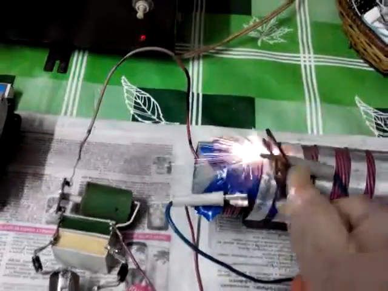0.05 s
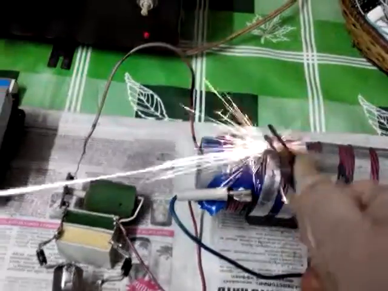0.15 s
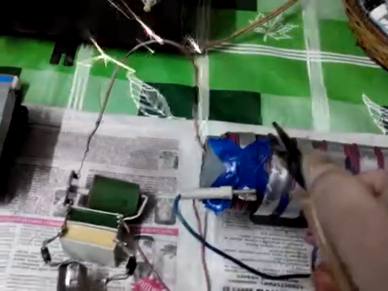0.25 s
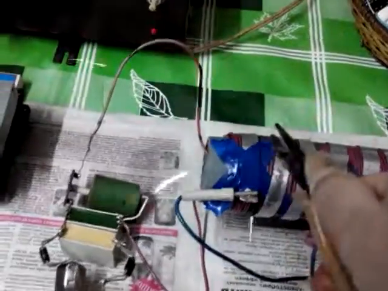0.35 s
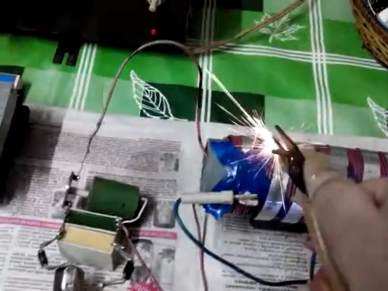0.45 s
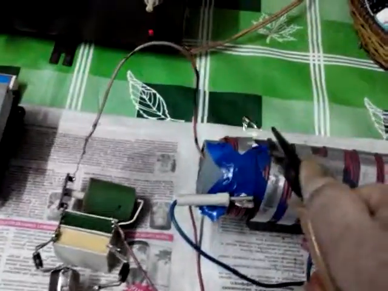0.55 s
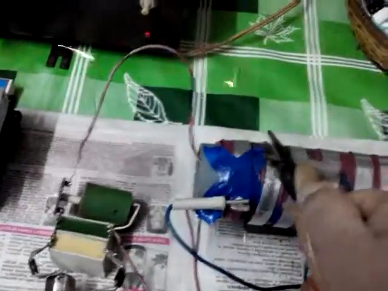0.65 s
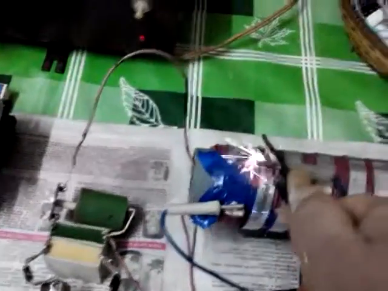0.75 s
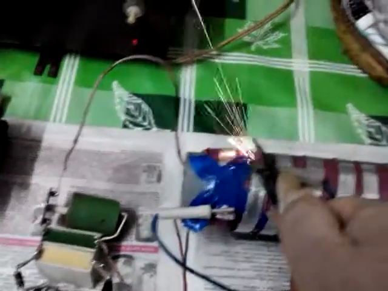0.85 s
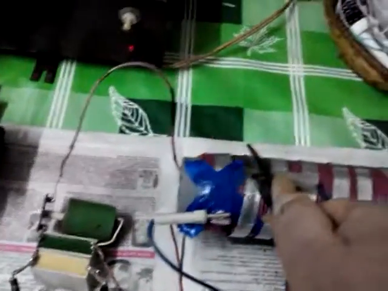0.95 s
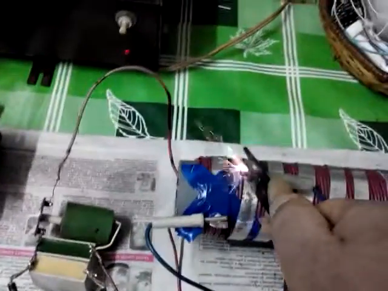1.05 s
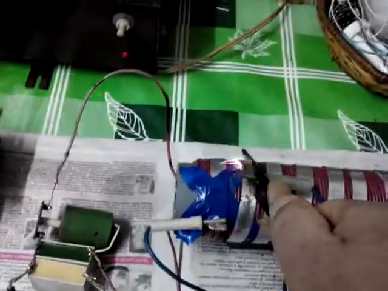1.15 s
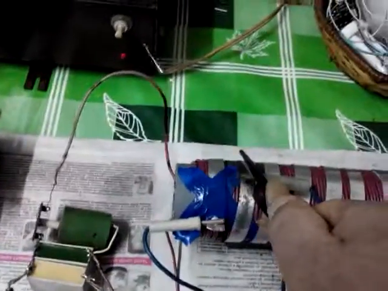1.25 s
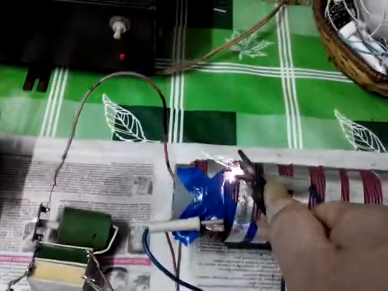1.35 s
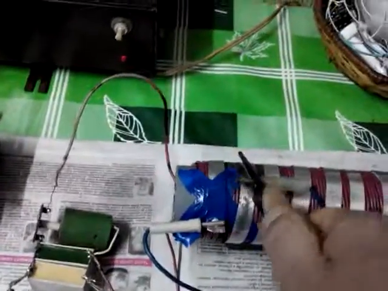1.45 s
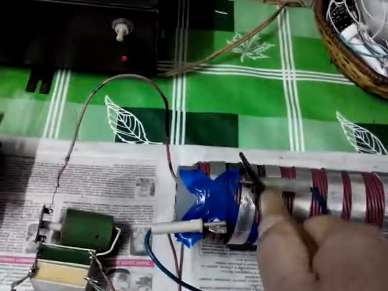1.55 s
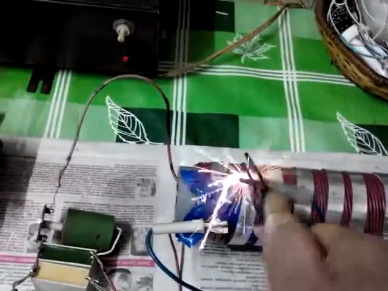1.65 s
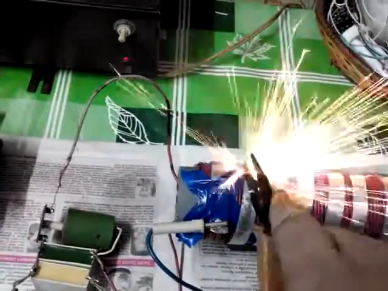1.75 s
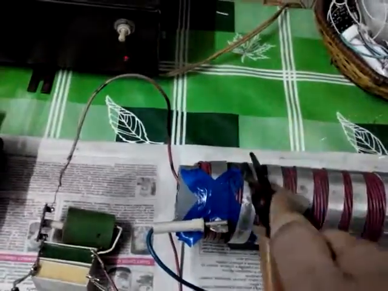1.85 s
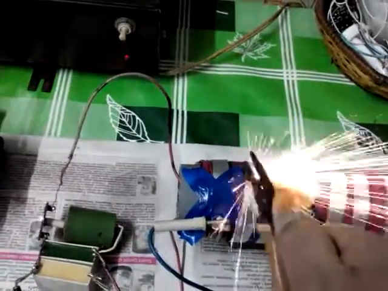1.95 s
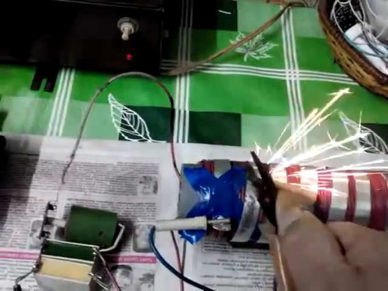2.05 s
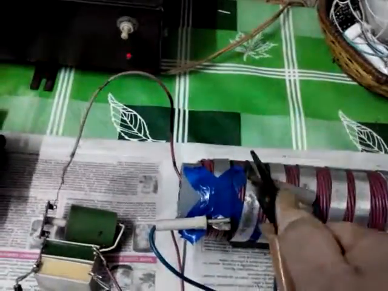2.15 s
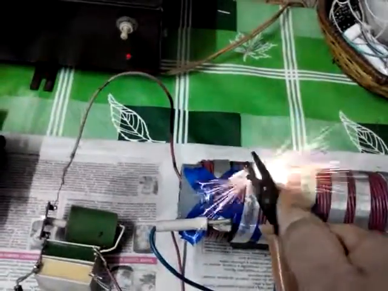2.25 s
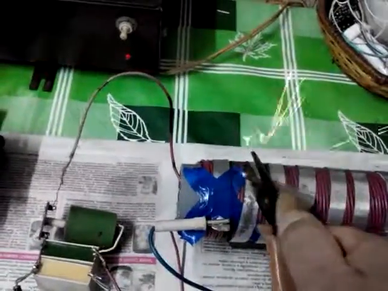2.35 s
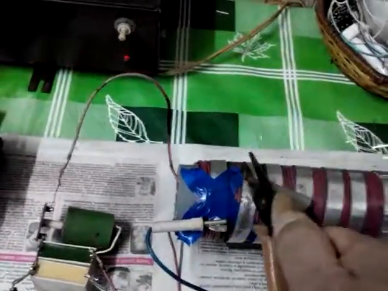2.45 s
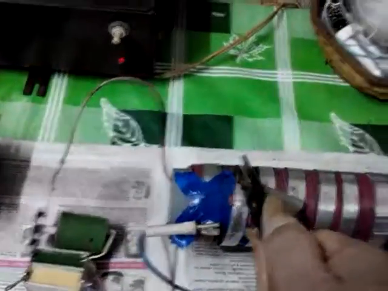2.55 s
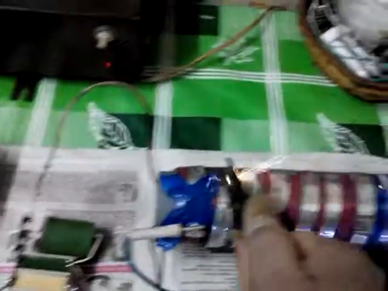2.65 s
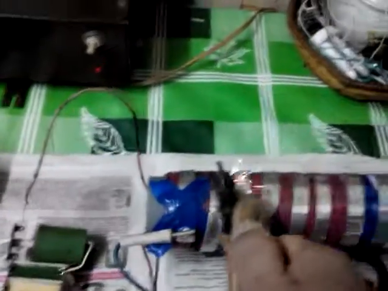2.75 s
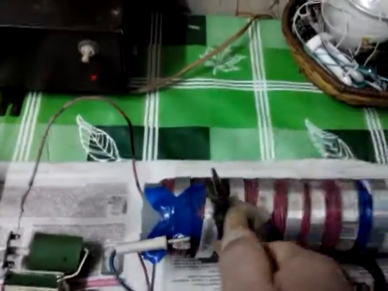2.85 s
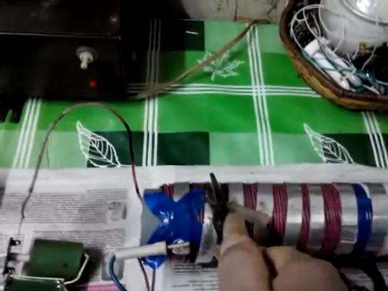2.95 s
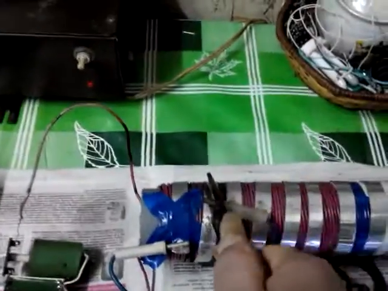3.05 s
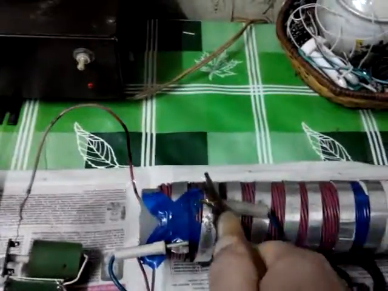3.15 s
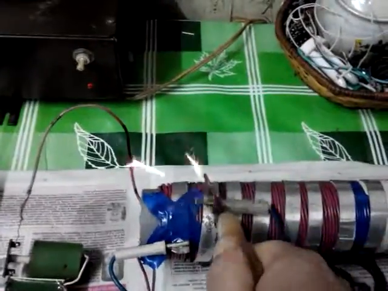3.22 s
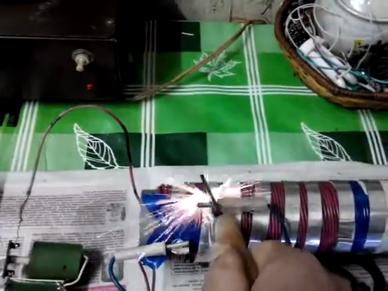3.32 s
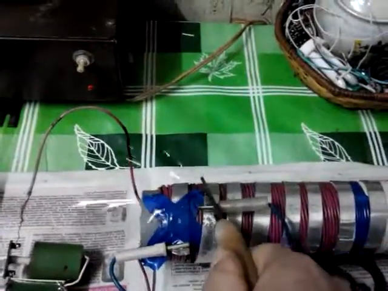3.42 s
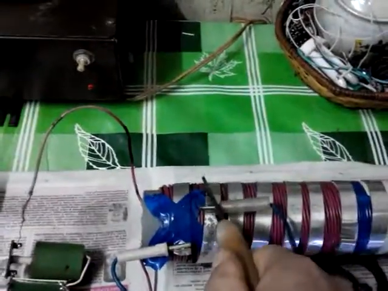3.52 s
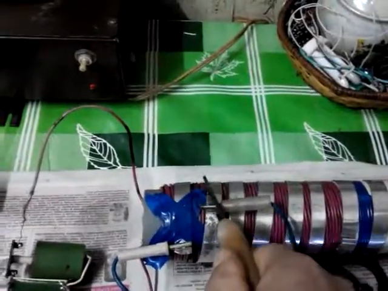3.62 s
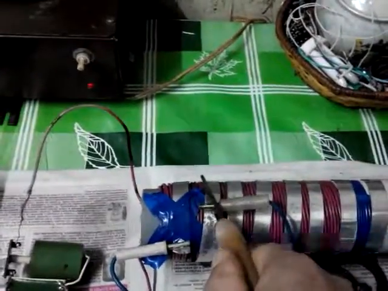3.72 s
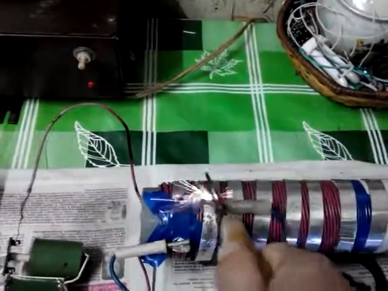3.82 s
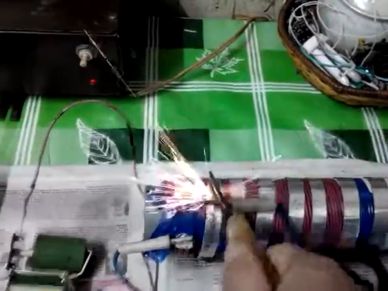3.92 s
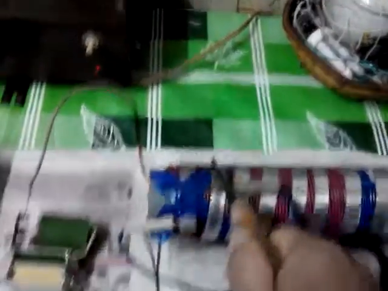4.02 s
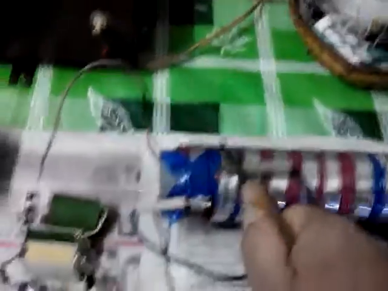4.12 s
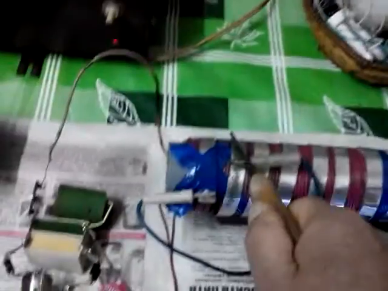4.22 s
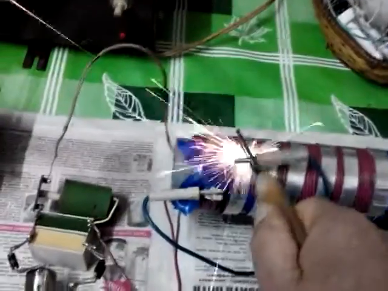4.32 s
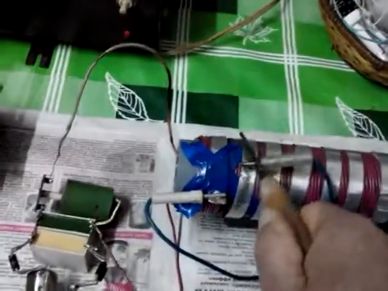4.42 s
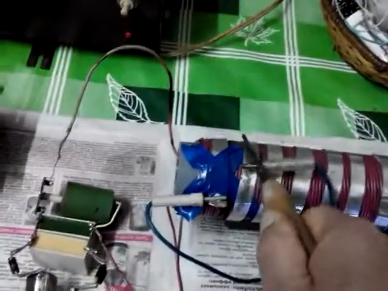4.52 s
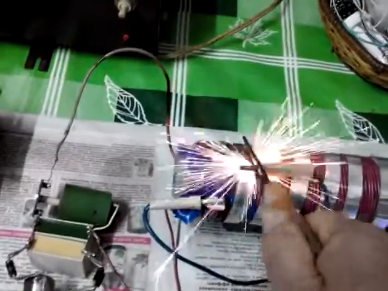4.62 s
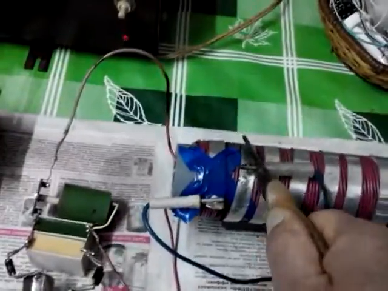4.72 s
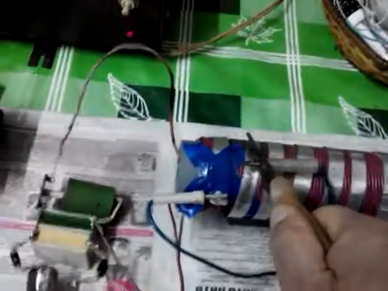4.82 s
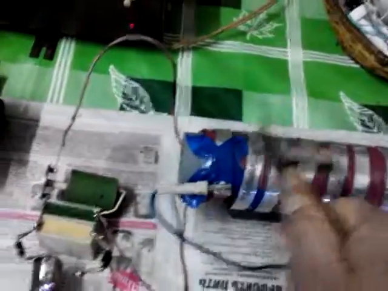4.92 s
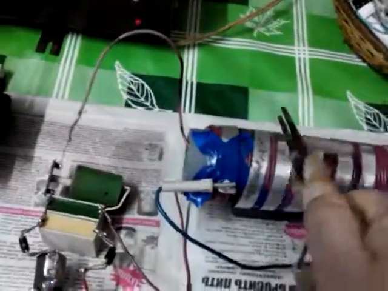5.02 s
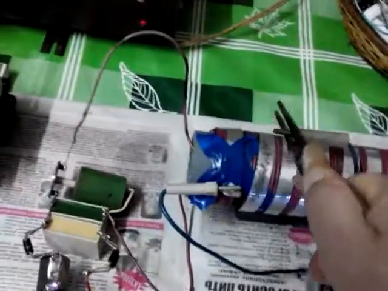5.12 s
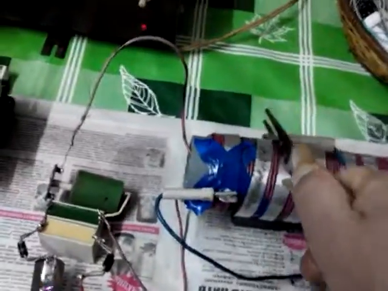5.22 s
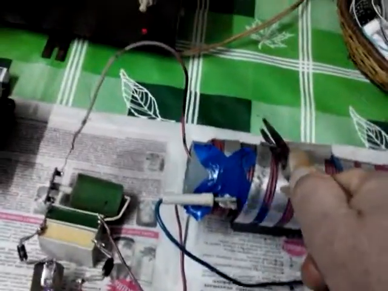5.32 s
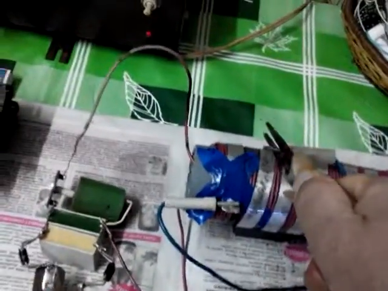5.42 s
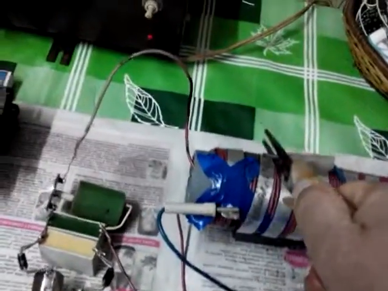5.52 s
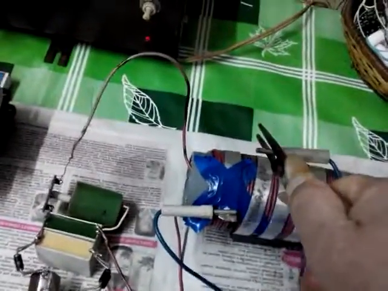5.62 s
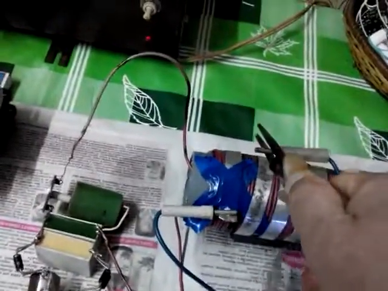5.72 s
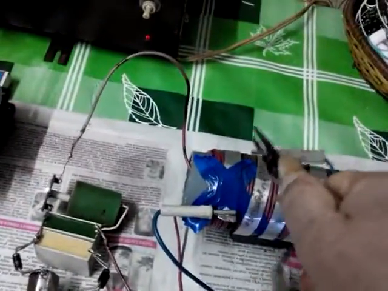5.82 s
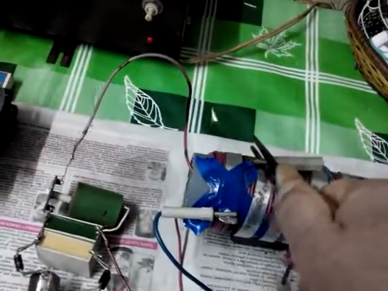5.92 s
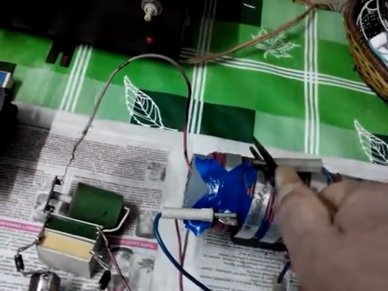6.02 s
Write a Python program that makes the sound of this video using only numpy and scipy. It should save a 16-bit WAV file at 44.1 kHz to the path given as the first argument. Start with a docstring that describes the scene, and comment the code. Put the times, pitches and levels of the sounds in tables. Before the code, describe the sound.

Rapid high-voltage sparks rattle like a fast hard ticking, irregular in strength. Strong crackling bursts open the scene, ease off, return louder near two seconds, then thin to small metallic clicks with a few medium cracks around four. A hand-held clamp bumps the coil near five seconds. Close phone microphone, slightly overloaded, small indoor room, quiet low hum.

```python
"""A transformer hums over a low room rumble and a thin circuit whine; at once a relay chatters, about 13 breaks/s.
It pulses a home-wound high-voltage coil on a workbench, close to a phone. Each break fires a spark: a pressure
spike, tube ring, bounce and scattered noise, then a noise room tail. Where a hand-held clamp bites the winding,
the spark cracks loudly and pushes a low thump. The relay's metal rings faintly as decaying sines.
Hand bumps add a knock (decaying sine) and a metal tick (filtered noise)."""
import sys
import numpy as np
from scipy import signal
from scipy.fft import rfft, irfft, next_fast_len
from scipy.io import wavfile
from scipy.ndimage import map_coordinates

SR = 44100
rng = np.random.default_rng(int(sys.argv[2]) if len(sys.argv) > 2 else 0)


def inscribe(sig):
    """Save sig as 16-bit PCM at rate SR to the path in sys.argv[1].

    A 1-D sig is mono; a 2-D sig holds one channel per row.
    Samples are clipped to [-1, 1] before scaling.
    """
    pcm = np.round(np.clip(np.atleast_2d(sig).T, -1, 1) * 32767)
    wavfile.write(sys.argv[1], SR, pcm.astype(np.int16))


N = 267687  # samples
SIDES = np.array([[1], [-1]])  # left, right


def amp(db):
    """Decibels to gain."""
    return 10 ** (np.asarray(db) / 20)


def unit(x):
    """x at rms 1."""
    return x / np.sqrt(np.mean(x ** 2) + 1e-20)


def along(points, hz):
    """Interpolate (Hz, value) points on a log frequency axis."""
    f, v = np.transpose(points)
    return np.interp(np.log(hz + 1), np.log(f + 1), v)


def filtered(x, response):
    """x times a response of frequency."""
    n = x.shape[-1]
    m = next_fast_len(n + SR // 20)
    spectrum = rfft(x, m) * response(np.fft.rfftfreq(m, 1 / SR))
    return irfft(spectrum, m)[..., :n]


def coloured(x, points, size=2048):
    """x through a causal minimum-phase filter with the given (Hz, dB) shape."""
    gain = amp(along(points, np.fft.rfftfreq(size, 1 / SR)))
    cepstrum = irfft(np.log(gain))
    # fold the cepstrum to make the filter causal
    cepstrum[1:size // 2] *= 2
    cepstrum[size // 2 + 1:] = 0
    kernel = irfft(np.exp(rfft(cepstrum)))
    return signal.fftconvolve(np.atleast_2d(x), kernel[None], axes=1)[:, :x.shape[-1]]


def add(track, start_s, sound):
    """Mix a sound into the track at start_s, cut at the track's end."""
    rest = track[..., max(round(start_s * SR), 0):]
    part = rest[..., :sound.shape[-1]]
    part += sound[..., :part.shape[-1]]


def blend(shared, own, share):
    """Mix two noises, keeping the power."""
    share = np.clip(share, 0, 1)
    return np.sqrt(share) * shared + np.sqrt(1 - share) * own


def wander(rate_hz, spare):
    """Smooth random curve with rate_hz new values per second."""
    t = np.arange(N) / SR
    values = rng.standard_normal(N // SR * rate_hz + spare)
    return map_coordinates(values, [rate_hz * t])


# transformer hum partials: f/Hz, level/dB rms
HUM = [(100.2, -53), (200.4, -65.5), (301, -62)]


def transformer_hum(waver_rad=0.67):
    """Mains hum: sine partials, each wavering slowly in phase."""
    t = np.arange(N) / SR
    hum = np.zeros(N)
    for hz, db in HUM:
        phase = 2 * np.pi * hz * t + waver_rad * wander(4, 8)
        hum += amp(db) * np.sqrt(2) * np.sin(phase)
    return hum


# room rumble spectrum, relative: f/Hz, density/dB per Hz
AIR = [(20, -12), (40, -5.5), (65, -5), (90, 2), (132, 6.5), (170, -8), (240, -11), (305, -9.5), (450, -18),
       (900, -28.5), (2000, -29.5), (4000, -18), (7500, -28), (9000, -69.5)]


def room_rumble(air_db=-51, side_db=-19, wide_hz=700):
    """Shaped noise, nearly alike at both ports in the bass, wider above wide_hz."""
    noise = rng.standard_normal((2, N))
    mid, side = unit(filtered(noise, lambda hz: amp(along(AIR, hz))))
    side = filtered(side, lambda hz: amp(side_db) + hz ** 2 / (hz ** 2 + wide_hz ** 2))
    return amp(air_db) * np.array([mid + side, mid - side])


# circuit whine, before left-right balance: t/s, level/dB rms
WHINE = [(0, -66.5), (4.4, -69.5), (4.8, -85), (5.2, -69), (5.5, -70), (6.07, -67)]


def whine(hz=2642, pan_db=-8, waver_rad=0.63):
    """Thin circuit tone: a sine, slightly unsteady in phase, mostly on the right."""
    t = np.arange(N) / SR
    level = amp(np.interp(t, *np.transpose(WHINE)) + SIDES * pan_db / 2)
    phase = 2 * np.pi * hz * t + waver_rad * wander(12, 16)
    return level * np.sqrt(2) * np.sin(phase)


WEAK_DB, STRONG_DB = -23, -14.5  # strengths that take the weak and the strong colour
# weak snap, mostly the relay's own click: f/Hz, left level/dB, right level/dB
WEAK_COLOUR = [(700, 2, 2), (1830, 4, 0.5), (3000, -6.3, -1), (3900, 2, -1.5), (4260, 0, -4),
               (5630, 1.5, -1), (6700, 6.5, 2.5), (7050, 7.5, 3)]
# strong crack on the coil: f/Hz, left level/dB, right level/dB
STRONG_COLOUR = [(686, 5, -0.5), (1310, 3, -1.5), (2030, 0.5, -2), (2920, 0, -4.5), (3730, 2.5, 0.5),
                 (4600, 1.5, -2.5), (5530, 0, -2.5), (6340, -2.5, -4), (7260, 0, -4.5)]


def spark_colour(snap_db, hz):
    """Left and right dB curves, weak to strong and on beyond, as strength grows."""
    def curves(colour):
        return np.array([along(np.array(colour)[:, [0, port]], hz) for port in (1, 2)])

    weak, strong = curves(WEAK_COLOUR), curves(STRONG_COLOUR)
    mix = max((snap_db - WEAK_DB) / (STRONG_DB - WEAK_DB), 0)
    return weak + (strong - weak) * mix


def at_ports(x, hz, tilt_db):
    """Each port's signal through its own dB curve."""
    return np.vstack([coloured(port, np.transpose([hz, db])) for port, db in zip(x, tilt_db)])


# coil's foil-wrapped tube, relative levels: f/Hz, level/dB, t60/s
TUBE = [(3544, -4.5, 0.012), (4930, -8, 0.014), (5900, -5.5, 0.0084), (6250, 1, 0.0043), (7600, -4, 0.0032)]


def snap(paths, snap_db, front_db=23.0, bounce=0.12, tube_db=2, scatter_db=11.5, mid_t60_s=0.019,
         growth_per_db=0.018, alike=0.27, reach_s=0.0045, flight_s=.00015, small_hz=2400, soft=0.02):
    """Pressure spike, tube ring, a bounce, and scatter off the small things within reach."""
    t = np.arange(paths.shape[1]) / SR
    # strong sparks jump along the coil and last longer
    life_s = mid_t60_s * np.exp(growth_per_db * (snap_db + 17.5))
    scatter = blend(paths[2], paths[:2], alike) * amp(-60 * t / life_s)
    scatter = scatter * (t > flight_s) / (1 + (t / reach_s) ** 10)

    # small things throw back mainly short waves
    def short_waves(hz):
        return np.sqrt(soft ** 2 + hz ** 4 / (hz ** 4 + small_hz ** 4))

    out = amp(scatter_db) * filtered(scatter, short_waves)
    out[:, 0] += amp(front_db)
    early = t[:SR // 50]
    for hz, db, t60_s in TUBE:
        add(out, 0, amp(tube_db + db - 60 * early / t60_s) * np.cos(2 * np.pi * hz * early))
    # the spark wanders, so the bounce notches each snap at new pitches
    delays_s = rng.uniform(.00025, .0011, 2)
    out[[0, 1], (delays_s * SR).astype(int)] += bounce * amp(front_db)
    return out


# room tail's starting spectrum, relative: f/Hz, level/dB
ROOM_COLOUR = [(100, -31), (400, 5), (1100, -13), (2000, -4), (2900, 3.5), (3620, -1), (4100, 5),
               (5400, -0.5), (6500, -0.5), (8000, -6)]
# room tail's decay: f/Hz, t60/s
ROOM_DECAY = [(200, 0.033), (1000, 0.26), (4000, 0.2), (8000, 0.18)]


def room_tail(noise, size=256):
    """Noise in which each frequency dies at the room's own speed."""
    hz, t, spectrum = signal.stft(noise, SR, nperseg=size)
    start_db = along(ROOM_COLOUR, hz)[:, None]
    fall_db = 60 * t / along(ROOM_DECAY, hz)[:, None]
    tail = signal.istft(spectrum * amp(start_db - fall_db), SR, nperseg=size)[1]
    return tail[:, :noise.shape[-1]]


# nearest hard surfaces: delay/s, level over the diffuse tail/dB
WALLS = [(.0064, -1.5), (.009, -1.5), (0.0141, -14)]


def room(paths, room_db=13, left_db=1, smear_s=0.0018):
    """Smeared early wall answers and a diffuse tail that builds up around the first of them."""
    t = np.arange(paths.shape[1]) / SR
    walls = sum(amp(db) * np.exp(-((t - delay_s) / smear_s) ** 2) for delay_s, db in WALLS)
    onset = 1 - np.exp(-(t / WALLS[0][0]) ** 2)
    return room_tail(paths[:2]) * np.hypot(onset, walls) * amp(room_db + SIDES * left_db)


# relay breaks: t/s, spark strength/dB
SPARKS = [(0.032, -19), (0.1075, -17), (0.178, -12.0), (0.2496, -16), (0.3171, -15.5), (0.3892, -14.5),
          (0.4738, -10), (0.5536, -15), (0.6296, -22), (0.7029, -18), (0.7825, -21.5), (0.8552, -12.5),
          (0.9358, -13.0), (1.014, -16.5), (1.0896, -18.5), (1.1587, -18.5), (1.2305, -19.5),
          (1.3074, -19.0), (1.385, -20), (1.457, -20.5), (1.5301, -20.5), (1.6146, -20.5), (1.695, -22.5),
          (1.768, -25), (1.8428, -24.0), (1.912, -13.5), (1.9929, -9), (2.0758, -22), (2.1438, -11),
          (2.2139, -15.5), (2.289, -17), (2.3587, -10.5), (2.4371, -12.0), (2.509, -12.5), (2.586, -11.5),
          (2.68, -16), (2.7642, -21.5), (2.8488, -19.5), (2.9195, -23.5), (2.9915, -21.5), (3.0688, -23),
          (3.1462, -19.0), (3.234, -21.5), (3.3045, -23), (3.3749, -16), (3.4424, -23), (3.5153, -13.0),
          (3.587, -16), (3.6536, -14), (3.7249, -26), (3.7939, -25), (3.8658, -25), (3.9397, -25.5),
          (4.0171, -23.5), (4.0876, -18.0), (4.1607, -15.5), (4.2357, -15.5), (4.3117, -15), (4.3882, -13),
          (4.4706, -23.0), (4.5574, -16), (4.6377, -22.5), (4.7146, -21.5), (4.7826, -22.5), (4.8771, -17),
          (4.96, -22), (5.034, -24.5), (5.1019, -24.5), (5.1733, -22), (5.246, -24), (5.3149, -24.5),
          (5.384, -23), (5.4544, -22.5), (5.5287, -23.5), (5.6022, -19.5), (5.6718, -24.0), (5.7596, -20.0),
          (5.8463, -19.5), (5.9163, -22.0), (5.9881, -22), (6.0627, -23.5)]
# snaps as the phone moves over the bench: t/s, left-right/dB, mean body level/dB
PLACE = [(0, -3, 3), (1.1, -1, -0.5), (1.6, -5, -2), (2.55, 0, 3.5), (3.3, -4, -6), (3.8, -4.5, 5),
         (4.35, -2.5, -1), (4.7, -7, 4.5), (5.05, -4.5, 0), (6.07, -7.5, 0.5)]


def sparks(same_near=0.21, same_far=0.78, room_tilt=0.52, body_scatter_db=1.8, body_hz=2300,
           crack_grows=0.61, echo_db=-29, echo_grows=1.74, click_echo_db=-43.5):
    """Strength sets each spark's colour and echo; part of the pattern stays, part changes with hand and phone."""
    out, shape = np.zeros((2, N)), (3, SR // 4)
    standing = rng.standard_normal(shape)
    hz = np.geomspace(500, 8000, num=33)
    body = 1 / (1 + (hz / body_hz) ** 10)
    times, *place = np.transpose(PLACE)
    for s, snap_db in SPARKS:
        pan_db, body_db = [np.interp(s, times, column) for column in place]
        tilt_db = spark_colour(snap_db, hz)
        over_db = snap_db - STRONG_DB
        # above STRONG_DB the direct crack grows faster: crack_grows extra dB per dB
        crack_gain = amp(snap_db + crack_grows * max(over_db, 0) + SIDES * pan_db / 2)
        # echo_grows dB per dB of strength, over a fixed answer to the relay's click
        echo_gain = np.hypot(amp(echo_db + echo_grows * over_db), amp(click_echo_db))
        fresh = rng.standard_normal(shape)
        near = snap(blend(standing, fresh, same_near), snap_db)
        near = at_ports(near, hz, tilt_db + body * rng.normal(body_db, body_scatter_db))
        far = at_ports(room(blend(standing, fresh, same_far)), hz, room_tilt * tilt_db)
        add(out, s, crack_gain * near + echo_gain * far)
    return out


# armature and frame modes, relative levels: f/Hz, level/dB, t60/s, left-right/dB
RELAY = [(3655, -14, .13, 0), (4048, 1.5, .15, 9), (4177, -13, .2, 0), (4545, -6, .2, -7),
         (4770, -13, .2, 0), (5300, -1.5, .15, -1), (6250, -15, .13, 0), (6700, -15, .15, 0)]
# ring strength reaching the moving phone, before scatter: t/s, level/dB
RING = [(0, -42), (2.5, -41), (2.9, -37.5), (4.05, -36), (4.45, -40), (5.1, -43), (6.07, -43)]


def relay(scatter_db=2):
    """The armature strikes at every break; its modes ring at slightly new strengths."""
    out, t = np.zeros((2, N)), np.arange(SR // 2) / SR
    hz, db, t60_s, pan_db = np.transpose(RELAY)[:, :, None]
    modes = amp(db - 60 * t / t60_s) * np.exp(2j * np.pi * hz * t)
    # each mode reaches each port at its own level and phase
    phases = np.exp(2j * np.pi * rng.random((2, len(RELAY))))
    ports = amp(SIDES * pan_db.T / 2) * phases
    for s in np.array(SPARKS)[:, 0]:
        ring_db = np.interp(s, *np.transpose(RING))
        strength = amp(ring_db + rng.normal(0, scatter_db, ports.shape))
        add(out, s, ((ports * strength) @ modes).imag)
    return out


# heavy discharges, before the low cut: t/s, push level/dB
THUMPS = [(0.177, -23), (0.3173, 19.5), (0.4737, 5), (0.855, -6), (1.912, 10), (1.992, -1), (2.1435, -6.5),
          (2.3588, -16), (2.435, -18.5), (2.509, -15), (2.585, -24), (3.3746, -22.5), (4.16, -20)]


def thumps(rise_s=0.0017, fall_s=.006):
    """A heavy discharge gives one push of air: fast exponential rise, slower fall."""
    out, t = np.zeros(N), np.arange(SR // 10) / SR
    push = (1 - np.exp(-t / rise_s)) * np.exp(-t / fall_s)
    for s, db in THUMPS:
        add(out, s, amp(db) * push)
    return out


# hand bumps the coil against the bench: t/s, knock level/dB, metal tick level/dB
TAPS = [(0.228, -30, -50), (1.06, -31, -45), (5.1335, -27, -27.5)]


def taps(tick_t60_s=0.07, bench_hz=100, bench_t60_s=0.098, rise_s=0.0055, low_hz=2000, high_hz=6500):
    """Metal on wire ticks as band-limited noise; the bench knocks as a decaying sine."""
    def tick_band(hz):
        return 1 / np.hypot(1, (low_hz / (hz + 1)) ** 2 + (hz / high_hz) ** 10)

    out, t = np.zeros((2, N)), np.arange(SR // 5) / SR
    for s, knock_db, tick_db in TAPS:
        tick = amp(tick_db - 60 * t / tick_t60_s) * rng.standard_normal((2, len(t)))
        knock = amp(knock_db - 60 * t / bench_t60_s) * np.sin(2 * np.pi * bench_hz * t)
        knock = knock * (1 - np.exp(-t / rise_s))
        add(out, s, knock + filtered(tick, tick_band))
    return out


def low_cut(x, hz):
    """The microphone's bass filter, in which a push swings out as a short boom."""
    return signal.sosfilt(signal.butter(4, hz, "high", fs=SR, output="sos"), x)


# left port's phase against the right: f/Hz, phase/rad
LEFT_PHASE = [(200, 0.5), (650, -1.76), (1300, -1.98), (2200, -0.48), (3500, -0.74), (4400, -0.51),
              (5600, -2), (8000, -3.5)]
# microphone ports' response: f/Hz, level/dB
LEFT_PORT = [(100, -13), (700, -17.5), (1500, -14.5), (2500, -10.5), (3050, -5.5), (3650, 5), (4200, 0),
             (4700, -4), (5600, -5.5), (6300, -13), (7200, -7.5), (7800, -17.5), (8400, -23.5), (9100, -37)]
RIGHT_PORT = [(100, -11), (700, -8.5), (1500, -9.5), (2500, -6), (3400, -4.5), (4200, -3), (5300, 1),
              (6200, -0.5), (7200, -5.5), (7800, -11), (8400, -22), (9200, -37)]
# bass filter corners: left f/Hz, right f/Hz
LOW_CUT_HZ = (83, 79)


def scene():
    """Sharp sounds reach two differently coloured ports out of step; the other layers add directly."""
    left, right = sparks() + relay()
    left = filtered(left, lambda hz: np.exp(1j * along(LEFT_PHASE, hz)))
    ports = np.vstack([coloured(left, LEFT_PORT), coloured(right, RIGHT_PORT)])
    ports = ports + thumps()
    sharp = np.array([low_cut(x, hz) for x, hz in zip(ports, LOW_CUT_HZ)])
    return sharp + taps() + whine() + transformer_hum() + room_rumble()


def record(dry, edge_hz=8800, top_hz=16300, knee=1.02, clip=.99):
    """Loud cracks overload the phone: soft squash, steep treble cut at edge_hz, hard clip, top cut."""
    squashed = dry / (1 + np.abs(dry / knee) ** 4) ** (1 / 4)
    narrow = filtered(squashed, lambda hz: 1 / np.sqrt(1 + (hz / edge_hz) ** 60))
    clipped = np.clip(narrow, -clip, clip)
    return filtered(clipped, lambda hz: hz < top_hz)


dry = scene()
out = record(dry)
inscribe(out)
```